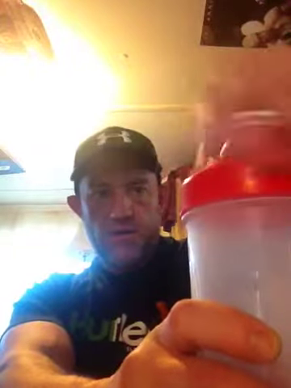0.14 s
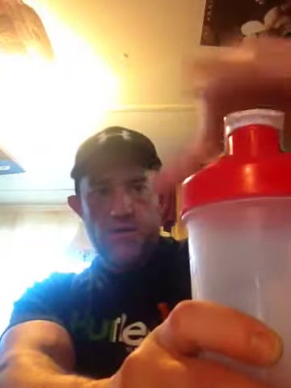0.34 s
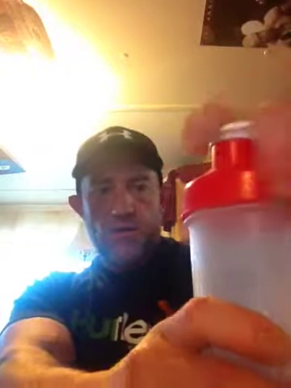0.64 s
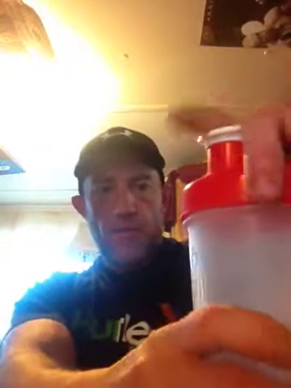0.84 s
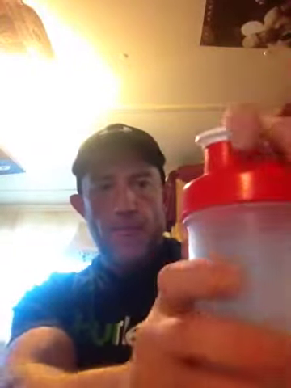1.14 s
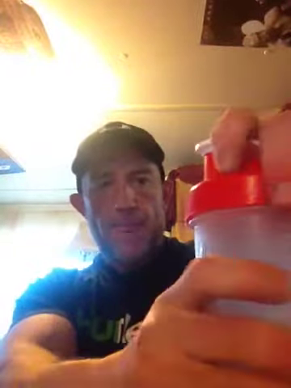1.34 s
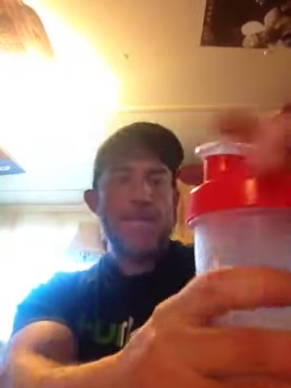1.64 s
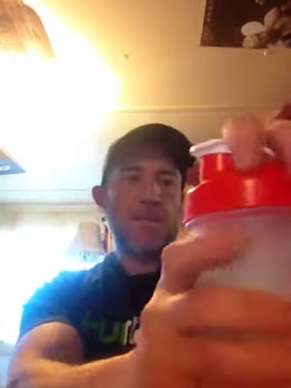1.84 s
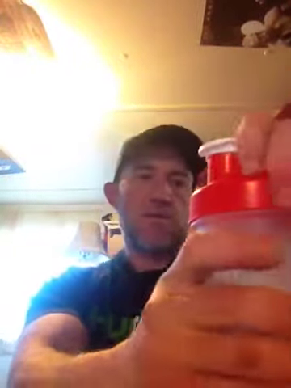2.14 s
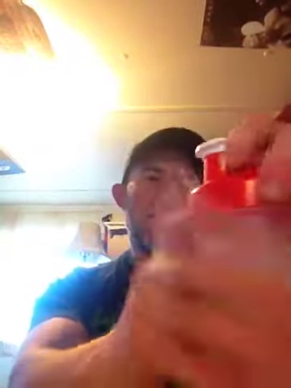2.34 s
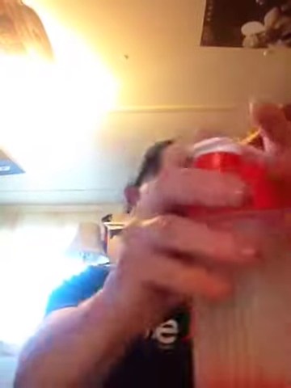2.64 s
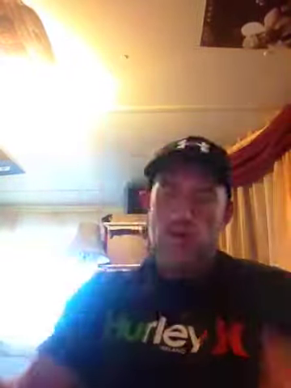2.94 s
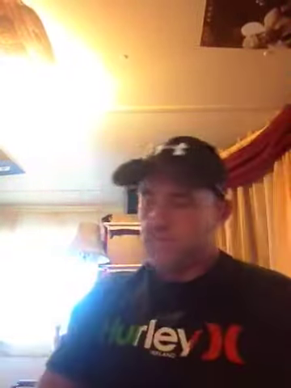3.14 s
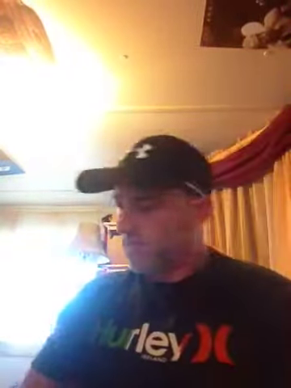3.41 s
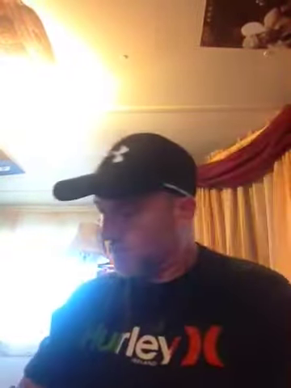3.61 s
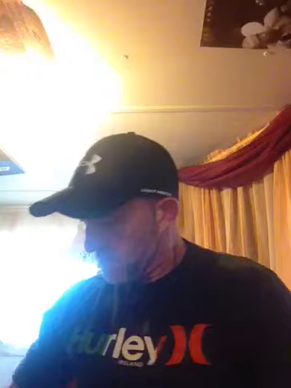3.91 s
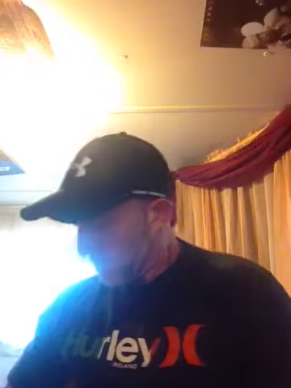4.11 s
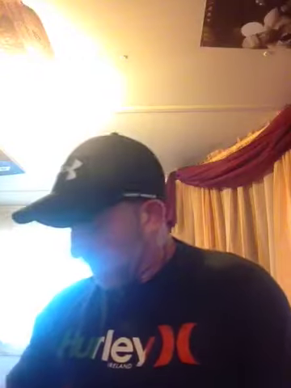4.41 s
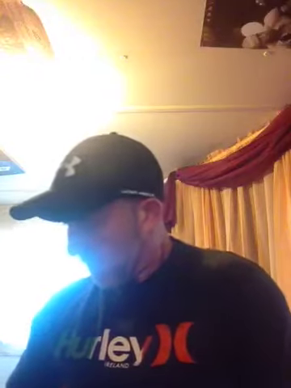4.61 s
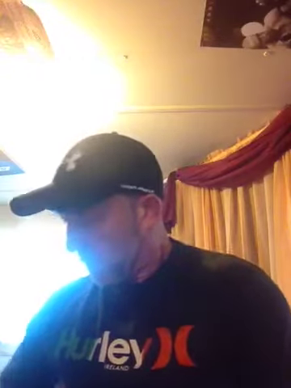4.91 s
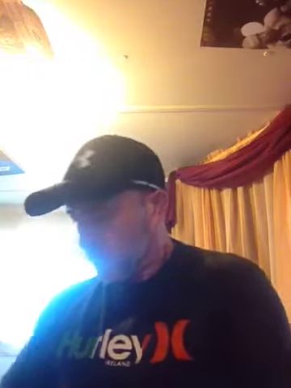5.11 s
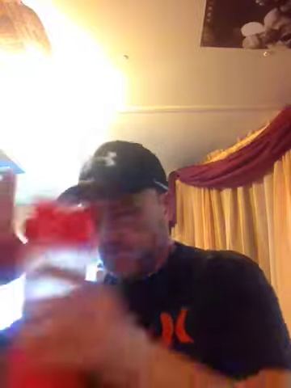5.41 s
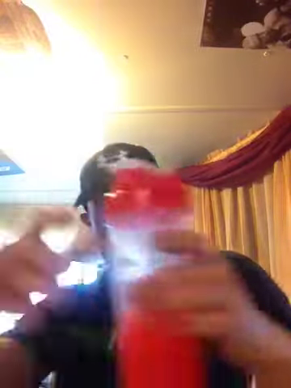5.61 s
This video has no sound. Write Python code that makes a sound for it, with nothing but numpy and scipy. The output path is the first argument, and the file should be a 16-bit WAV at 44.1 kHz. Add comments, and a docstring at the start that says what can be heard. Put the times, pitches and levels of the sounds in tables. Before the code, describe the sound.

A close microphone in a quiet living room catches a plastic shaker cup being handled, over very faint room air and hiss. From 0 to about 2.7 seconds, fingers rub the lid with dry, scratchy strokes and press it, making small creaks. Irregular taps ring the hollow cup as short, dull, boxy thumps: a few around 0.15 to 0.3, a strong cluster at 1.0 to 1.3, and another at 2.3 to 2.7. Hard plastic clicks punctuate them. After a brief lull, a bright crack and wet slap at 3.1 begin the shaking. Liquid hits the ends at uneven, quick intervals, strongest at 3.1, 3.3, 3.7 and 4.4, with hissing spray, fizzing droplets, gurgles and rounded glugs between. The sloshing weakens toward 5.2. Sharp plastic snaps at about 5.3 and a light click at 5.4 follow, then near quiet until about 6 seconds. The room adds only a short, dull tail.

```python
"""Fingers rub the lid of a plastic shaker cup, close to the microphone in a quiet living room.
They press and tap it so that the hollow cup thumps, with sharp clicks of hard plastic; then the cup is
shaken, its liquid slapping the ends, spraying and gurgling, with snaps near the end. Filtered random
grains make skin and spray; decaying sines ring as cup modes and bubbles; a short noise tail is the room."""
import sys
import numpy as np
from scipy import signal
from scipy.fft import rfft, irfft
from scipy.io import wavfile

SR = 44100
rng = np.random.default_rng(int(sys.argv[2]) if len(sys.argv) > 2 else 0)


def natural_amplitude(level_db):
    """Convert a level in decibels to a linear amplitude factor, elementwise."""
    exponent = np.asarray(level_db, float) / 20
    return 10 ** exponent


def master(y):
    """Save y as 16-bit WAV."""
    cut = np.clip(np.atleast_2d(y).T, -1, 1)
    pcm = np.round(cut * 32767)  # scale
    wavfile.write(sys.argv[1], SR, pcm.astype(np.int16))


N = 254093  # samples

# knocks that make the cup ring: fingertip taps, then the low body of the late snaps:
# start_s, low_modes_db, upper_modes_db
KNOCKS = [(0.133, -29, -31), (0.165, -32, -34.5), (0.176, -29, -53), (0.199, -30, -34), (0.299, -38.5, -55),
          (0.479, -42, -63), (0.664, -56, -33), (0.74, -37, -41), (0.894, -40.5, -54), (0.965, -24.5, -55),
          (0.984, -22, -34), (0.996, -15.5, -42), (1.001, -30, -28), (1.019, -21, -40), (1.059, -31, -44),
          (1.071, -28, -49), (1.097, -31.5, -44), (1.162, -35.5, -39.5), (1.226, -35, -74),
          (1.263, -23.5, -29.5), (1.274, -25.5, -30), (1.335, -28.5, -42), (1.385, -52, -38),
          (1.46, -31, -34.5), (1.68, -37.5, -63), (1.699, -40.5, -50), (1.712, -32.5, -63),
          (1.797, -38.5, -37), (1.815, -39.5, -50), (1.874, -39, -64), (1.891, -35.5, -48),
          (2.038, -46, -53), (2.151, -38.5, -51.5), (2.338, -25.5, -35), (2.423, -23.5, -24.5),
          (2.467, -33.5, -56), (2.531, -29.5, -34.5), (2.543, -27, -38), (2.659, -33, -58),
          (2.69, -21, -30.5), (2.707, -29.5, -65), (2.725, -23.5, -34), (5.321, -52, -36.5),
          (5.336, -52.5, -39.5), (5.631, -59, -45.5)]
# modes of the cup and its air: pitch_hz, relative_level_db, t60_s
CUP_MODES = [(130.3, 7, 0.083), (165.4, 4.5, 0.097), (213.6, 3, 0.12), (316.5, 6.5, 0.04),
             (368.5, 0.5, 0.071), (451.5, -9.5, 0.054), (659, -7.5, 0.03), (873, -10, 0.038),
             (982, -8.5, 0.023), (1190, -5, 0.013), (1530, -24.5, 0.059)]
# relative spectrum of drops on the wall: frequency_hz, density_db (per Hz)
SPRAY_SPECTRUM = [(710, -3.5), (1200, -9.5), (1390, 5.5), (1690, -6.5), (2860, 3), (3430, -1.5), (4340, 7),
                  (5040, -6.5), (7330, -8), (9570, -32), (12100, -30), (15500, -36.5)]


def rms_one(x):
    """Scale to rms 1."""
    return x / np.sqrt(np.mean(x ** 2) + 1e-20)


def band_filter(x, order, hz, kind):
    """Causal Butterworth filter: low, high or band."""
    return signal.sosfilt(signal.butter(order, hz, kind, fs=SR, output="sos"), x)


def in_time(rows):
    """Gains from dB curves, practically silent before the first row and after the last."""
    s, *columns = np.transpose(rows)
    now = np.arange(N) / SR
    return [natural_amplitude(np.interp(now, s, column, left=-150, right=-150)) for column in columns]


def swells(times, peak_db, rise_s, fade_s):
    """Gain of overlapping swells, each climbing and fading by 20 dB in its own times; powers add."""
    now = np.arange(0, N, 16) / SR
    age = now - np.reshape(times, (-1, 1))
    span = np.where(age < 0, np.reshape(rise_s, (-1, 1)), np.reshape(fade_s, (-1, 1)))
    span = np.maximum(span, .002)
    power = natural_amplitude(np.reshape(peak_db, (-1, 1)) - 20 * np.abs(age) / span) ** 2
    return np.interp(np.arange(N) / SR, now, np.sqrt(power.sum(axis=0)))


def bursts(times, peak_db, t60, rise_share):
    """Envelope that swells quickly and dies away, one burst per event."""
    out, age = np.zeros(N + SR), np.arange(SR // 4) / SR
    for s, db, fade in zip(times, peak_db, np.clip(t60, .003, .4)):
        shape = natural_amplitude(-60 * age / fade) * (1 - np.exp(-age / (rise_share * fade)))
        out[round(s * SR):][:len(age)] += natural_amplitude(db) * shape / shape.max()
    return out[:N]


def colour(x, points):
    """Causal filter with the given spectrum (minimum phase through the folded cepstrum)."""
    hz, db = np.transpose(points)
    grid_hz = np.linspace(1, SR / 2, 2049)
    curve_db = np.interp(np.log(grid_hz), np.log(hz), np.maximum(db, -90))
    cepstrum = irfft(curve_db * np.log(10) / 20)
    cepstrum[1:2048] *= 2
    cepstrum[2049:] = 0
    return signal.fftconvolve(x, irfft(np.exp(rfft(cepstrum))))[:N]


def drift(rate):
    """Slow random wandering of rms 1: noise through two equal low-pass poles at the rate in Hz."""
    r = np.exp(-2 * np.pi * rate / SR)
    noise = rng.standard_normal(N + SR)
    return rms_one(signal.lfilter([1], [1, -2 * r, r * r], noise)[SR:])  # drop the filter's start


def ring(impulses, hz, t60):
    """A unit impulse sets a decaying sine of starting height 1 ringing."""
    r, w = natural_amplitude(-60 / (max(t60, .002) * SR)), 2 * np.pi * hz / SR
    return signal.lfilter([0, np.sin(w)], [1, -2 * r * np.cos(w), r * r], impulses + 1e-18)


def ring_modes(impulses, modes):
    """Impulses excite several modes at their relative levels, with alternating signs."""
    return sum(natural_amplitude(db) * ring(impulses, hz, t60) * (-1) ** k for k, (hz, db, t60) in enumerate(modes))


def grains(per_s, spread_db):
    """Random impulses of either sign; with a spread, a few are large."""
    sizes = natural_amplitude(spread_db * np.minimum(rng.exponential(1, N), 5)) * rng.choice([-1, 1], N)
    return sizes * (rng.random(N) < per_s / SR)


def house_air():
    """Air of the house and hiss of the microphone: coloured noise with a slightly wandering level."""
    # relative spectrum: frequency_hz, density_db (per Hz)
    air_spectrum = [(25, -36), (60, -16.5), (150, -7), (300, -11), (750, -16.5), (2000, -22.5),
                    (4400, -20.5), (8000, -30.5), (10000, -38.5), (15500, -27.5)]
    level_db = -66.5 + 0.13 * drift(3.9)
    return natural_amplitude(level_db) * rms_one(colour(rng.standard_normal(N), air_spectrum))


def skin_rub(rub_gain):
    """Skin slips over plastic in fine, coloured grains; harder rubbing has slightly more treble."""
    # relative spectrum of the rubbing: frequency_hz, density_db (per Hz)
    rub_spectrum = [(710, -19), (1860, -9), (3320, -6), (4380, -1.5), (5090, -10), (5730, -11), (7330, -14),
                    (9890, -32), (14700, -26), (15500, -39.5)]
    rub = rms_one(colour(grains(9000, spread_db=0.0), rub_spectrum))
    rub = rub * rub_gain * natural_amplitude(1.34 * drift(82))
    treble = band_filter(rub, 4, 8800, "high")
    # 0.023 dB per dB of rubbing above or below -52 dB
    brightening = (rub_gain / natural_amplitude(-52)) ** 0.023
    return rub + treble * (brightening - 1)


def pressed_cup(rub_gain, pressure):
    """Shifting fingers push the low modes of the cup and creak the upper ones."""
    knock_s, _, upper_db = np.transpose(KNOCKS)
    rub_share = 0.067  # share of the creak that follows rubbing rather than pressure
    creak = natural_amplitude(-4) * rub_gain ** rub_share * pressure ** (1 - rub_share)
    # after a knock the lid creaks on, fading 20 dB in 0.02 s
    creak = creak + swells(knock_s, upper_db - 10.5, 0.006, 0.02)
    pushes = grains(180, spread_db=3.5) * pressure
    creaks = grains(1500, spread_db=4.0) * creak
    # the sixth mode belongs to both groups
    return natural_amplitude(-10) * ring_modes(pushes, CUP_MODES[:6]) + natural_amplitude(-8.5) * ring_modes(creaks, CUP_MODES[5:])


def hands():
    """Fingers slide over the lid: each slide swells and fades both the rubbing and the pressure."""
    # slides: peak_s, rubbing_db, rise_ms and fade_ms (for 20 dB, at least 2 ms), pressure_db
    slides = [(0.004, -38, 32, 37, -43.5), (0.135, -47.5, -2, 154, -47.5), (0.213, -31, 35, 20, -59),
              (0.238, -48, 30, 46, -68), (0.487, -63.5, 109, 326, -57.5), (0.613, -45.5, 39, 210, -68),
              (0.674, -39.5, 92, 93, -42.5), (0.87, -61, 38, 323, -61), (0.951, -53, 125, 425, -55.5),
              (1.165, -51.5, 55, 380, -67), (1.265, -45, 106, 196, -55), (1.39, -48, 280, 240, -47),
              (1.458, -56.5, 192, 51, -43.5), (1.64, -55.5, 228, 280, -64), (1.715, -50, 91, 111, -69),
              (1.821, -51.5, 75, 90, -60), (1.946, -47.5, 52, 257, -68), (2.065, -61, 228, 46, -47.5),
              (2.206, -53.5, 96, 201, -56), (2.37, -47, 105, 131, -46.5), (2.412, -38.5, 59, 26, -64),
              (2.536, -51, 248, 226, -50), (2.732, -59, 380, 17, -74), (5.755, -63.5, 166, 50, -65.5)]
    s, rub_db, rise_ms, fade_ms, press_db = np.transpose(slides)
    rise_s, fade_s = rise_ms / 1000, fade_ms / 1000
    rub_gain = swells(s, rub_db, rise_s, fade_s)
    pressure = swells(s, press_db, rise_s, fade_s)
    return skin_rub(rub_gain) + pressed_cup(rub_gain, pressure)


def clicks():
    """One hard contact and a few milliseconds of crackle, duller for blunter contacts."""
    # sharp clicks of hard plastic: start_s, peak_db, upper_cutoff_hz
    contacts = [(0.129, -38, 4770), (0.447, -42, 4430), (1.0026, -27, 3130), (1.1, -35, 4930),
                (1.8137, -48, 4530), (2.1735, -36, 5250), (2.195, -39, 4470), (2.4253, -32.5, 3420),
                (3.0913, -19.5, 8300), (3.3135, -28, 5000), (4.432, -29, 4400), (5.205, -45.5, 4400),
                (5.316, -31.5, 4750), (5.322, -23, 4570), (5.3358, -32, 5160), (5.435, -40, 5100)]
    out, age = np.zeros(N + SR), np.arange(SR // 40) / SR
    noise = rng.standard_normal((len(contacts), len(age)))
    for (s, db, cut_hz), crackle in zip(contacts, noise):
        contact = (age == 0) + .25 * crackle * natural_amplitude(-60 * age / .012)
        click = band_filter(contact, 3, [0.22 * cut_hz, cut_hz], "band")
        out[round(s * SR):][:len(age)] += natural_amplitude(db) * click / np.abs(click).max()
    return out[:N]


def knocks():
    """Each knock shares its strength among the cup modes; the grip shifts strengths and pitches."""
    hz, db, t60 = np.transpose(CUP_MODES)[:, :, None]
    mode = np.arange(len(CUP_MODES))[:, None]
    low = mode < 5
    out, age = np.zeros(N + SR), np.arange(SR // 5) / SR
    share = natural_amplitude(db) / np.where(low, np.linalg.norm(natural_amplitude(db[:5])), np.linalg.norm(natural_amplitude(db[5:])))
    # the lowest modes swell over about 1.7 cycles
    swell = np.where(hz < 200, 1 - np.exp(-(age * hz / 1.7) ** 2), 1)
    decay = share * swell * natural_amplitude(-60 * age / t60) * (-1) ** mode
    grips = rng.standard_normal((len(KNOCKS), 2, len(CUP_MODES), 1))
    for (s, low_db, upper_db), (strength, pitch) in zip(KNOCKS, grips):
        gain = natural_amplitude(np.where(low, low_db, upper_db) + 2 * strength)
        sines = np.sin(2 * np.pi * hz * (1 + .04 * pitch) * age)
        out[round(s * SR):][:len(age)] += np.sum(gain * decay * sines, axis=0)
    return band_filter(out[:N], 2, 1500, "low")  # dull, as from a soft contact


def jolts():
    """The low push of every knock, felt through the hand: a deep, damped ring."""
    s, low_db, _ = np.transpose(KNOCKS)
    jolt_hz = 55.7
    blows = np.zeros(N)
    blows[np.round(s * SR).astype(int)] = natural_amplitude(low_db - 23.5)
    return band_filter(ring(blows, jolt_hz, 0.093), 2, [jolt_hz * 1.17, 2 * jolt_hz], "band")


def bubbles(per_s, low_hz, high_hz, cycles):
    """Bubbles of 16 sizes each lose 60 dB over the given cycles; their rate wanders; rms 1."""
    born = grains(per_s * natural_amplitude(5.0 * drift(25)), spread_db=0.5)
    size = rng.integers(0, 16, N)
    pitches = np.geomspace(low_hz, high_hz, 16)
    return rms_one(sum(ring(born * (size == k), hz, cycles / hz) for k, hz in enumerate(pitches)))


def patchy(x):
    """Every band of the sound flickers a little on its own."""
    edges_hz = [900, 1500, 2200, 3100, 4000, 5100, 7000, 10000, 18000]
    return sum(natural_amplitude(1.8 * drift(14)) * band_filter(x, 2, pair, "band")
               for pair in zip(edges_hz, edges_hz[1:]))


def spray():
    """Shaken drops patter on the walls in coloured grains while small bubbles fizz."""
    # vigour of the shaking: time_s, level_db
    vigour_curve = [(3.09, -41), (3.26, -40), (3.305, -40), (3.38, -39.5), (3.8, -44), (3.92, -54.5),
                    (3.96, -42.5), (4.18, -47.5), (4.24, -51), (4.3, -45.5), (4.43, -46.5), (4.46, -53.5),
                    (4.61, -48), (4.67, -55.5), (4.75, -45), (5.12, -52.5), (5.28, -79), (5.33, -44),
                    (5.4, -68), (5.66, -74.5), (5.76, -70)]
    vigour, = in_time(vigour_curve)
    patter = grains(3500 * natural_amplitude(4.0 * drift(36)), spread_db=2.0)
    patter = rms_one(patchy(colour(patter, SPRAY_SPECTRUM)))
    fizz = bubbles(700, 1800, 4700, cycles=18.0)
    return vigour * (natural_amplitude(-3.0) * patter + natural_amplitude(-5) * fizz)


def sloshes():
    """The liquid runs back through the cup after each stroke: bubbles gurgle, then a low surge."""
    # strokes: gurgle_peak_s, gurgle_db, surge_db, fade_s (for 20 dB)
    strokes = [(3.164, -43, -54, 0.37), (3.413, -40, -51, 0.14), (3.592, -46.5, -53.5, 0.3),
               (3.699, -60, -54, 0.6), (3.968, -45, -50.5, 0.02), (4.189, -43, -54, 0.07),
               (4.36, -53, -60, 1), (4.591, -47.5, -55.5, 0.09), (4.699, -52.5, -76, 0.26),
               (4.821, -50.5, -52, 0.1), (4.893, -46.5, -54, 0.07), (4.975, -56, -58.5, 0.1)]
    s, gurgle_db, surge_db, fade_s = np.transpose(strokes)
    gurgle = swells(s, gurgle_db, 0.029, fade_s)
    surge = swells(s + 0.011, surge_db, 0.074, fade_s)  # later and slower to rise
    gurgling = band_filter(bubbles(250, 760, 1920, cycles=9.4), 3, 640, "high")
    return gurgle * gurgling + surge * bubbles(150, 215, 522, cycles=23.5)


def slaps():
    """Liquid slaps an end of the cup: a swell of drops, with a treble level of its own."""
    # slaps: start_s, body_db (nominal peak), treble_db (rms at the crest), t60_s
    slap_rows = [(3.093, -25, -36.5, 0.13), (3.112, -22.5, -49, 0.031), (3.232, -33.5, -56, 0.18),
                 (3.313, -26, -42, 0.19), (3.515, -35, -41, 0.18), (3.6934, -26.5, -43.5, 0.16),
                 (3.946, -36, -54, 0.14), (4.06, -34, -47, 0.17), (4.1694, -39.5, -66, 0.23),
                 (4.4285, -28.5, -71, 0.051), (4.485, -31.5, -50.5, 0.15), (4.594, -36, -71, 0.067),
                 (4.723, -35.5, -52, 0.097), (4.749, -37.5, -63, 0.12), (4.781, -34.5, -55, 0.13),
                 (5.3126, -62, -40, 0.12)]
    s, peak_db, treble_db, t60 = np.transpose(slap_rows)
    drops = colour(grains(6000, spread_db=2.2), SPRAY_SPECTRUM)
    body = band_filter(drops, 4, [1700, 5100], "band")
    treble = band_filter(drops, 4, 5100, "high")
    crest = 2.5  # nominal peak of a swell over its rms
    return (rms_one(body) / crest * bursts(s, peak_db, t60, rise_share=0.018)
            + rms_one(treble) * bursts(s, treble_db, t60, rise_share=0.16))


def glugs():
    """A large bubble breaks into three that ring briefly and rise in pitch."""
    # large bubbles: start_s, level_db (before swell and decay), starting_pitch_hz
    large_bubbles = [(3.161, -23.5, 1316), (3.401, -32, 1430), (3.419, -29, 1440), (3.7, -31, 926),
                     (4.169, -38, 1070), (4.593, -32, 1330), (4.697, -35, 960), (4.816, -34, 1190),
                     (4.976, -44, 1190), (5.167, -44, 1190)]
    out, age = np.zeros(N + SR), np.arange(SR // 10) / SR
    chances = rng.standard_normal((len(large_bubbles), 3, 2))
    for (s, db, hz), draws in zip(large_bubbles, chances):
        for k, (detune, lag) in enumerate(draws):
            # the first bubble keeps the pitch and start of the table
            cycles = hz * (1 + .12 * detune * (k > 0)) * age
            shape = natural_amplitude(db - 2.83 * cycles - 1.3 * k) * (1 - np.exp(-cycles / 0.61))
            at = round((s + .004 * abs(lag) * k) * SR)
            out[at:][:len(age)] += shape * np.sin(2 * np.pi * (cycles + 0.0034 * cycles ** 2))
    return out[:N]


def room(x):
    """Living-room tail of dying noise, duller than the direct sound and 4 ms behind it."""
    age, t60_s = np.arange(SR // 2) / SR, 0.17
    tail = rng.standard_normal(len(age)) * natural_amplitude(-60 * age / t60_s) * (age > .004)
    tail = signal.lfilter([.5], [1, -.5], tail)
    return signal.fftconvolve(x, tail / np.sqrt(np.sum(tail ** 2)))[:N]


def scene():
    """The close cup in the room, over faint house air; so small a body radiates little bass."""
    cup = hands() + clicks() + knocks() + spray() + sloshes() + slaps() + glugs()
    cup = band_filter(cup, 4, 109, "high")
    return (house_air() + jolts() + cup + natural_amplitude(-13.5) * room(cup))[None]


def roll_off(x):
    """The treble ends steeply here."""
    return signal.sosfilt(signal.butter(12, 15800, fs=SR, output="sos"), x)


def record(dry):
    """The microphone port has a narrow dip; the very top is cut."""
    dip_hz, dip_width_hz, dip_depth = 5080, 200, .9  # depth: share removed at the centre
    b, a = signal.iirpeak(dip_hz, dip_hz / dip_width_hz, fs=SR)
    mix = dry - dip_depth * signal.lfilter(b, a, dry)
    # 50 dB down from 15900 Hz upward
    mix = signal.sosfilt(signal.cheby2(12, 50, 15900, fs=SR, output="sos"), mix)
    return roll_off(mix)


dry = scene()
out = record(dry)
master(out)
```